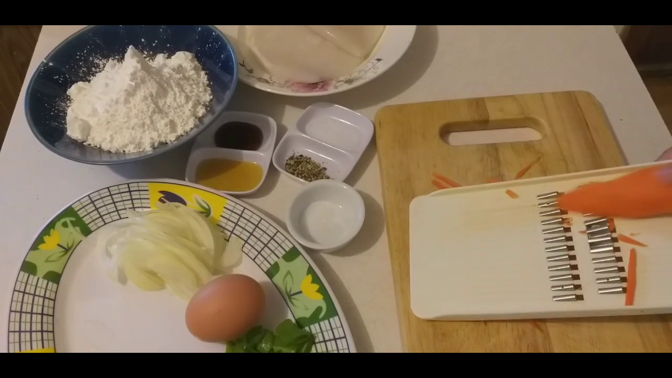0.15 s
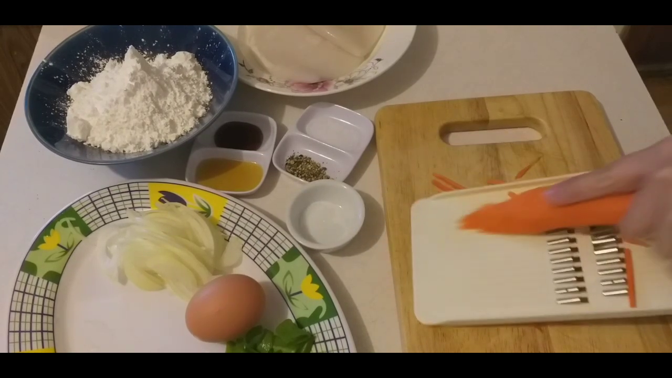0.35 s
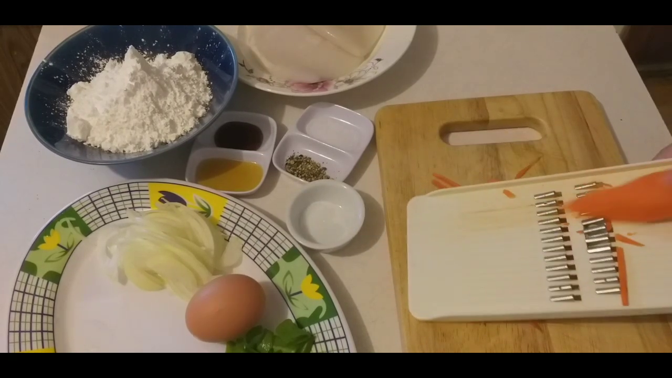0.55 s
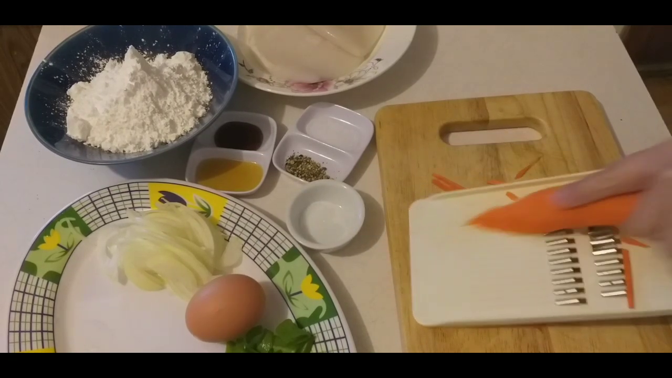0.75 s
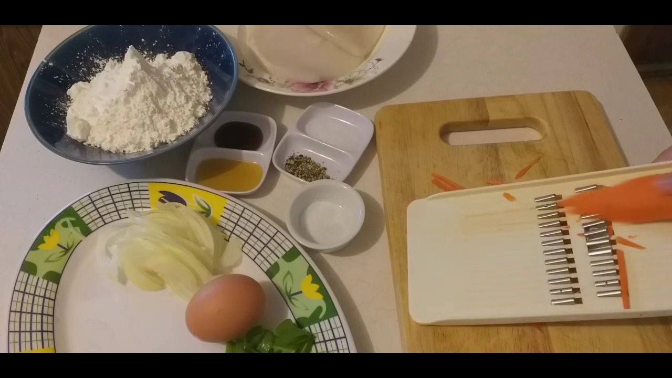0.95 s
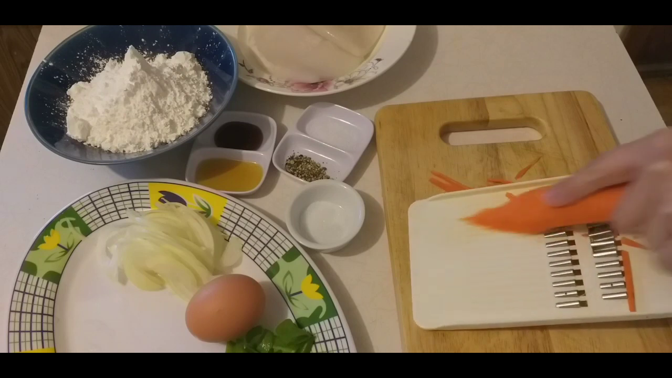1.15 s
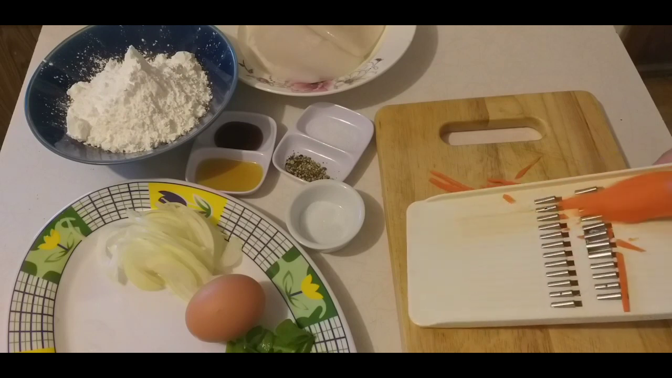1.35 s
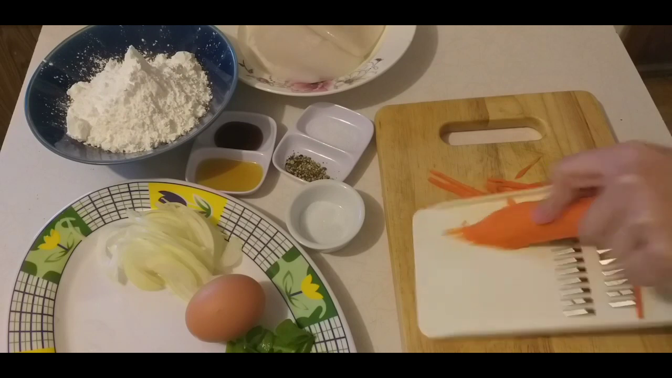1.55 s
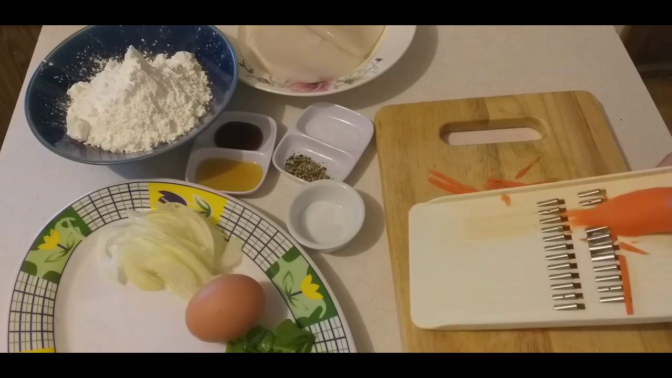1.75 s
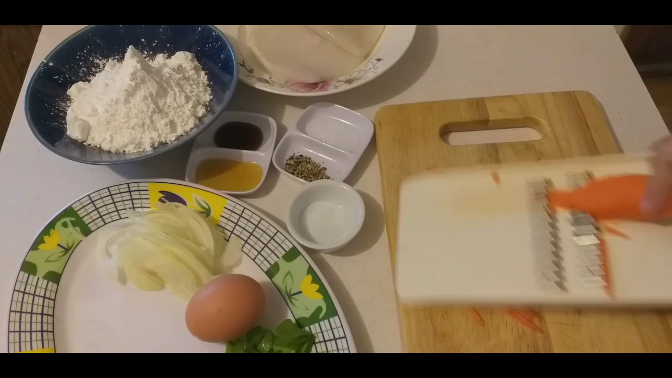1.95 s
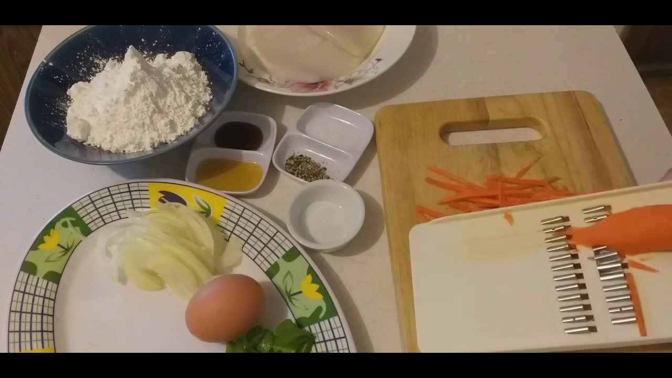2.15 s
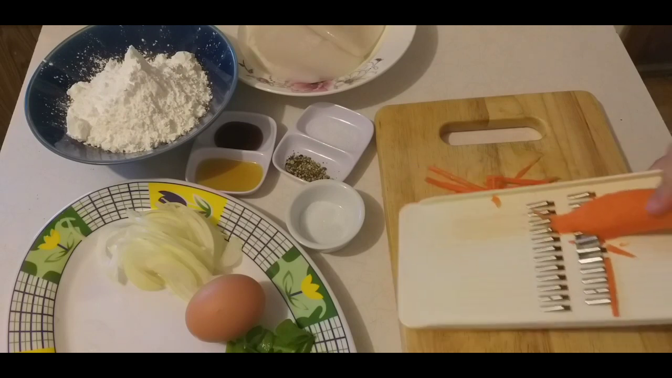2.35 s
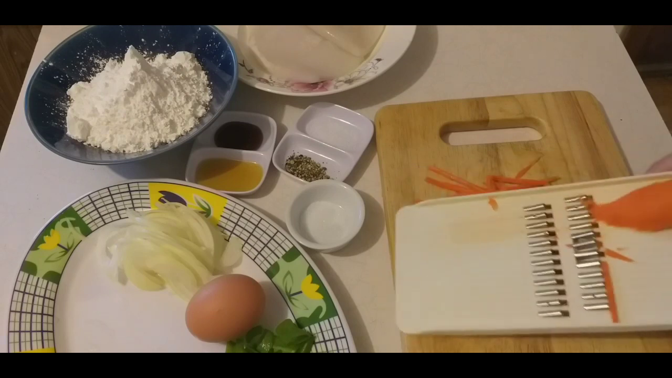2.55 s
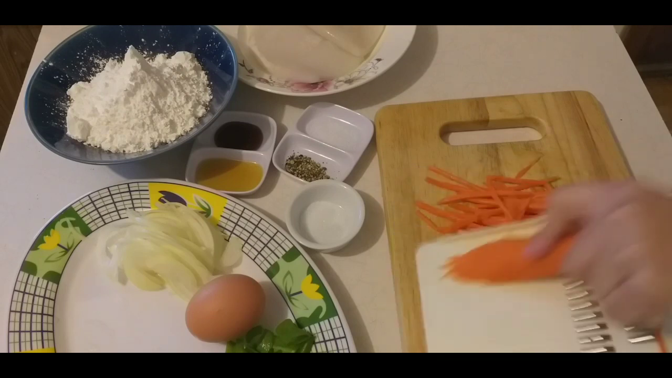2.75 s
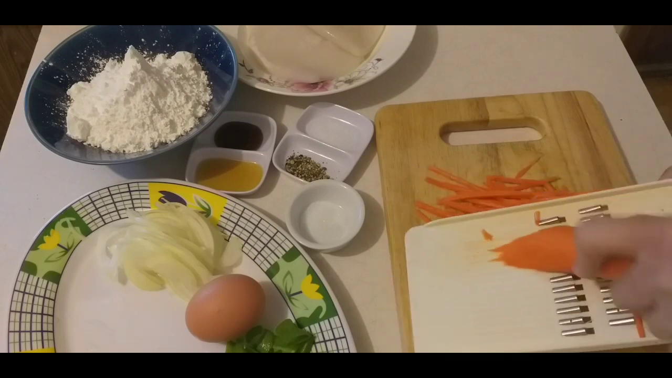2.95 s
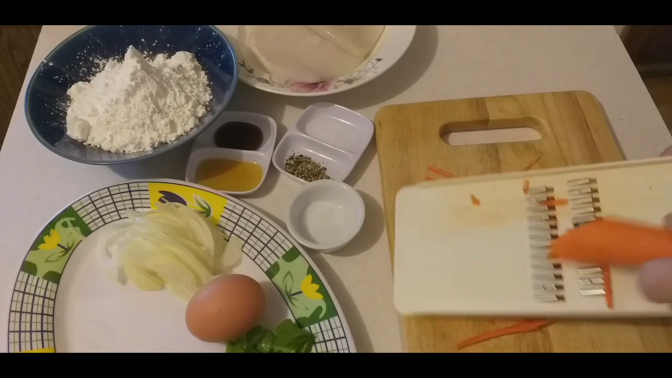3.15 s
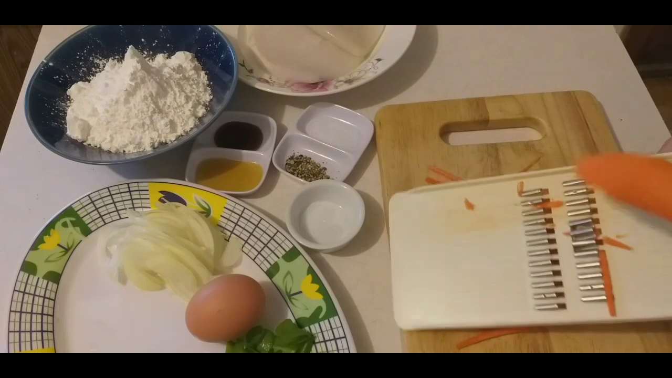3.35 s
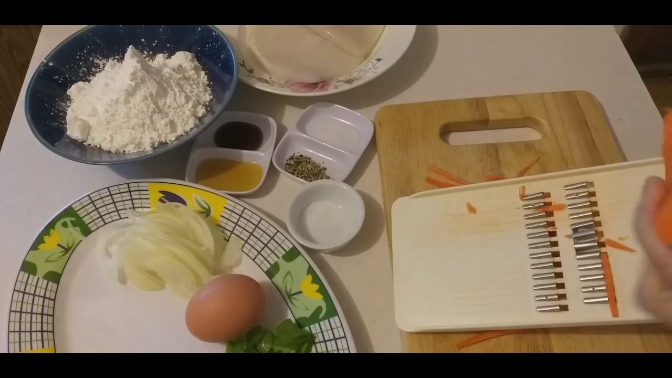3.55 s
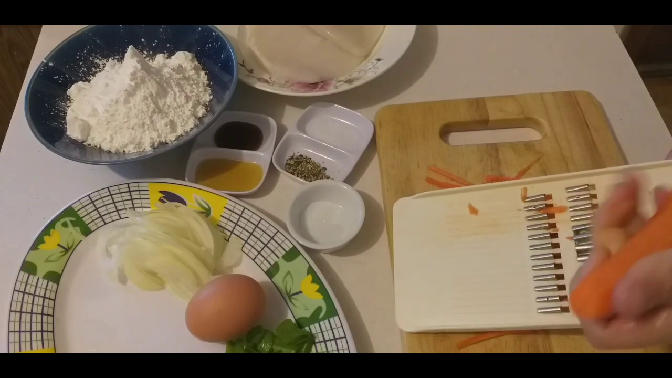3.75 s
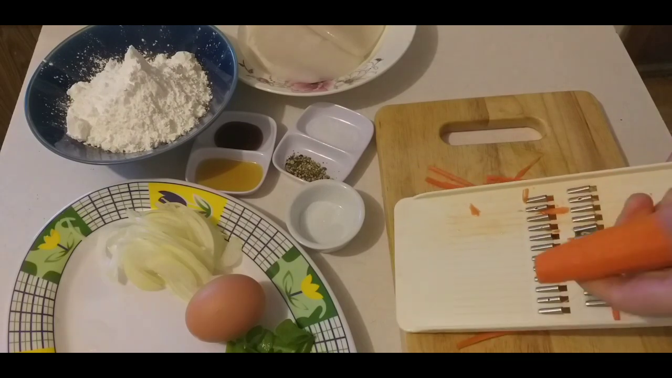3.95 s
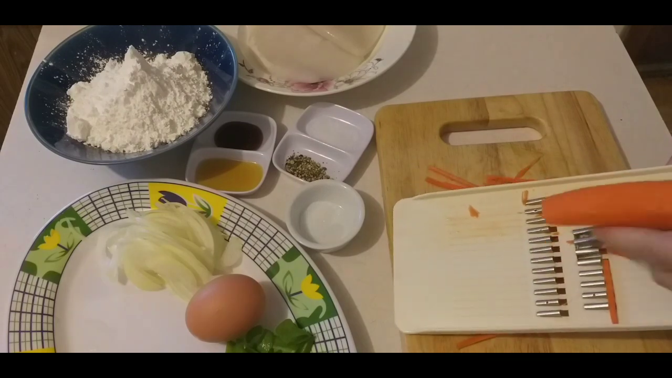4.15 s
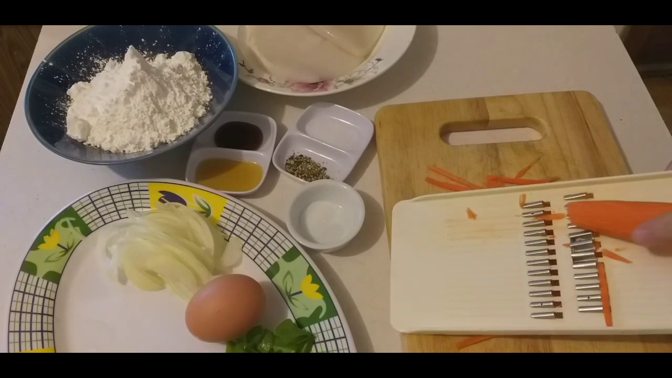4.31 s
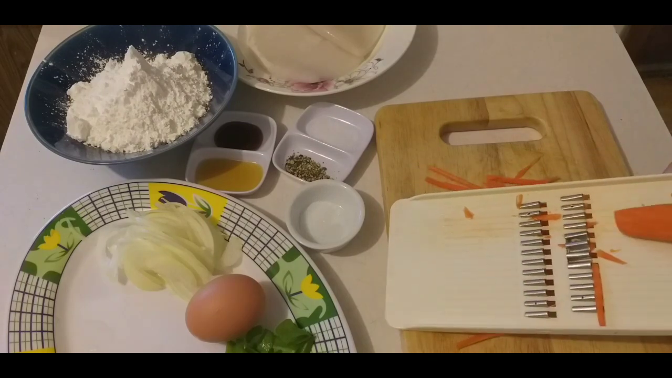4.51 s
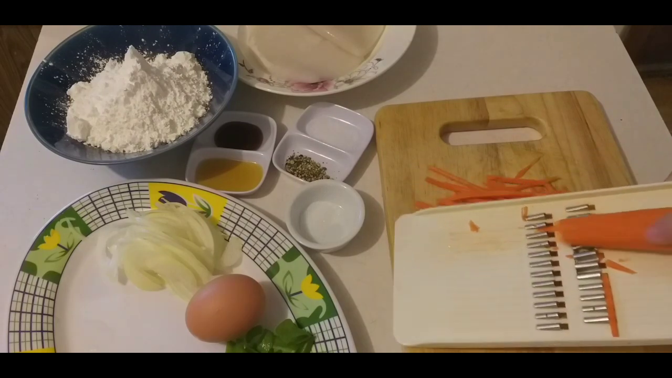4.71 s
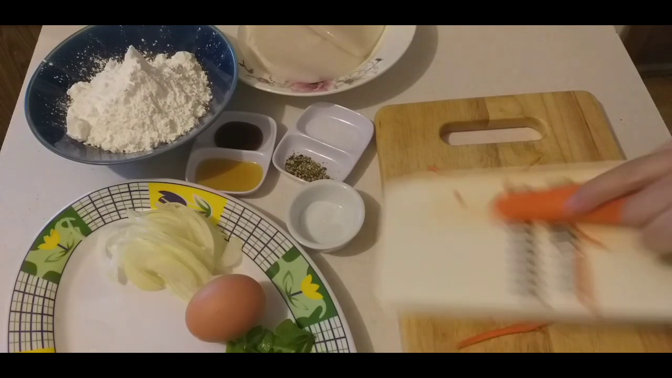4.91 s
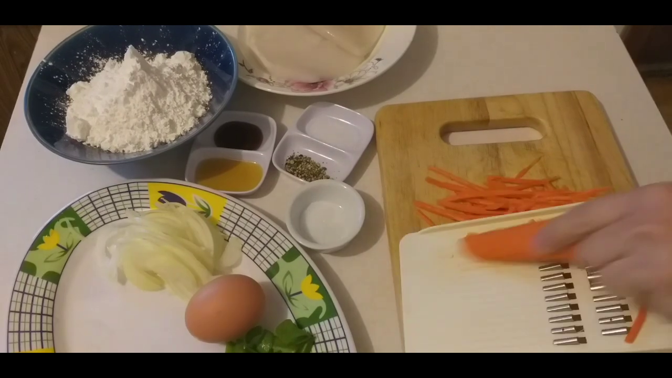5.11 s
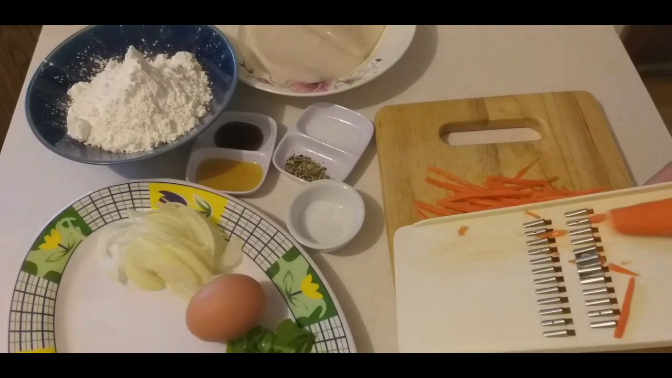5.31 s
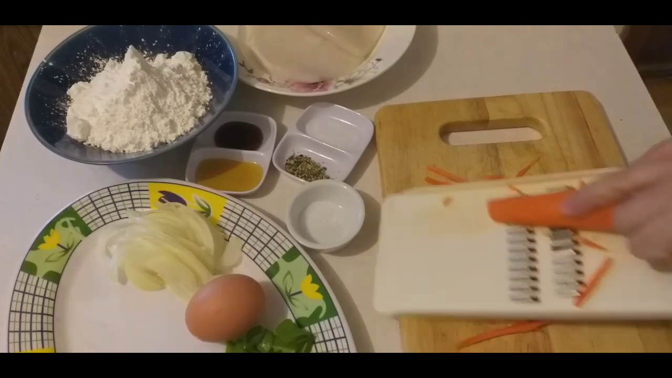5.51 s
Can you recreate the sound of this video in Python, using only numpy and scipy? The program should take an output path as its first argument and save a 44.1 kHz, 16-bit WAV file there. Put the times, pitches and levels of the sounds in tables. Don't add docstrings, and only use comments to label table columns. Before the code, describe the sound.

Close, dry, gritty carrot-slicing strokes with sharp snaps and knocks, a short near-silence in the middle, then quick harder pushes in a quiet kitchen.

```python
import sys
import numpy as np
from scipy import signal
from scipy.fft import rfft, irfft, next_fast_len
from scipy.io import wavfile
from scipy.ndimage import uniform_filter1d, map_coordinates

SR = 44100
rng = np.random.default_rng(int(sys.argv[2]) if len(sys.argv) > 2 else 0)


def volts_from_db(level):
    exponent = np.asarray(level, float) / 20
    return 10 ** exponent


def master(y):
    cut = np.clip(np.atleast_2d(y).T, -1, 1)
    pcm = np.round(cut * 32767)
    wavfile.write(sys.argv[1], SR, pcm.astype(np.int16))


N = 250488

# f/Hz, width/Hz, level/dB
TEETH_MODES = [(2500, 280, 3.5), (3210, 420, 3.5), (3526, 720, 2.5), (4860, 900, 4.5), (5700, 870, 5.5),
               (6900, 1100, 4), (8326, 690, 5.5)]
# f/Hz, density/dB per Hz
FIZZ_SPECTRUM = [(5290, -58.5), (9000, 7.5), (9920, -1.5), (12700, 3.5), (15100, -2.5), (16100, -26),
                 (16400, -29)]
# f/Hz, width/Hz, level/dB
PLATE_MODES = [(1030, 240, 1.5), (1207, 100, 7.5), (1530, 400, 1), (1760, 180, 7.5), (2070, 240, 3.5),
               (2735, 420, -2), (3600, 840, -3)]
# f/Hz, width/Hz, level/dB
BOARD_MODES = [(305, 79, 3.5), (443, 130, 3.5), (594, 59, 3.5), (773, 170, -5)]


def unit(x):
    return x / np.sqrt(np.mean(x ** 2) + 1e-20)


def along(points, hz):
    f, v = np.transpose(points)
    return np.interp(np.log(hz + 1), np.log(f + 1), v)


def wobble(rate):
    return map_coordinates(rng.standard_normal(int(N * rate / SR) + 4), [np.arange(N) * rate / SR])


def filtered(x, response):
    m = next_fast_len(N + SR // 2)
    return irfft(rfft(x, m) * response(np.fft.rfftfreq(m, 1 / SR)), m)[..., :N]


def body(modes, low_hz, top_hz=30000):
    def response(f):
        ring = 0
        for k, (centre, width, db) in enumerate(modes):
            band = 1j * f * width / (centre * centre - f * f + 1j * f * width)
            ring = ring + (-1) ** k * volts_from_db(db) * band
        return ring * (1j * f / (low_hz + 1j * f)) ** 4 / (1 + 1j * f / top_hz) ** 2
    return response


def floor():
    # f/Hz, density/dB per Hz
    air_spectrum = [(15, -38.5), (25, -14), (197, -4.5), (231, -13), (295, -13), (320, -12), (649, -25.5),
                    (828, -21), (1210, -27.5), (1310, -22.5), (1680, -33), (4220, -32.5), (4830, -33),
                    (15100, -36.5), (16400, -45)]
    # f/Hz, side minus mid/dB
    air_side = [(60, -18), (110, -18), (200, -22), (380, -22), (700, -16), (1290, -12), (2380, -7),
                (4400, -5), (8120, -2), (15000, -2)]
    # f/Hz, level/dB rms
    hum_partials = [(177.6, -89), (199.2, -76), (296.1, -77), (360.7, -84.5)]

    def colour(hz):
        return volts_from_db(along(air_spectrum, hz) + [0 * hz, along(air_side, hz)])

    air = filtered(rng.standard_normal((2, N)), colour)
    air *= volts_from_db(-67 + 0.24 * wobble(11)) / np.std(air[0])
    t = np.arange(N) / SR
    hum = np.zeros(N)
    for hz, db in hum_partials:
        level = volts_from_db(db + 3 + 3 * wobble(5.7))
        hum += level * np.sin(2 * np.pi * hz * t + 0.51 * wobble(13))
    return air[0] + hum, air[1]


def kitchen(x):
    # f/Hz, t60/s
    room_t60 = [(300, 0.29), (1400, 0.17), (2700, 0.13), (4000, 0.17), (9000, 0.05), (15000, 0.19)]
    out, hop = np.zeros(N + SR), SR // 4
    for start in range(0, N, hop):
        hz, t, z = signal.stft(rng.standard_normal(SR // 2), SR, nperseg=256)
        decay = volts_from_db(-60 * t / along(room_t60, hz)[:, None])
        tail = signal.istft(z * decay, SR, nperseg=256)[1]
        wet = signal.fftconvolve(x[start:start + hop], tail / np.linalg.norm(tail))
        out[start + 130:][:len(wet)] += wet
    return out[:N]


def scattered(x):
    z = signal.stft(x, nperseg=128)[2]
    turned = z * np.exp(2j * np.pi * rng.random(z.shape))
    return np.sqrt(2) * signal.istft(turned, nperseg=128)[1][:N]


def creaks():
    # t/s, length/s
    creak_times = [
        (3.155, .135),
        (3.348, .12),
        (3.373, .03),
    ]
    # f/Hz, width/Hz, level/dB
    creak_modes = [
        [(625, 160, -71.5), (1336, 40, -65.5), (1700, 210, -71.5)],
        [(399, 38, -64.5), (596, 180, -65), (1156, 170, -65.5), (1730, 180, -71)],
        [(1180, 250, -53.5), (510, 260, -78.5)],
    ]
    out, t = np.zeros(N), np.arange(N) / SR
    for (s, length), modes in zip(creak_times, creak_modes):
        swell = np.sqrt(np.sin(np.pi * np.clip((t - s) / length, 0, 1) ** 0.63))
        for hz, width_hz, db in modes:
            mode = body([(hz, width_hz, 0)], 100)
            rub = filtered(rng.standard_normal(N), lambda f: mode(f) ** 2)
            out += volts_from_db(db) * swell * unit(rub)
    return out


def taps():
    # t/s, crack peak/dB, plate over crack/dB, knock f/Hz
    knock_rows = [(0.2035, -31, -6.5, 1750), (0.4064, -23.5, -19, 1680), (1.0081, -27.5, -11.5, 1228),
                  (1.1134, -20, -16.5, 820), (1.4238, -20.5, -19, 1180), (1.6696, -41.5, -1, 1850),
                  (2.5806, -22, -9, 2000), (2.6194, -33, -12, 594), (2.8354, -25, -8.5, 1700),
                  (4.3687, -42, 4.5, 550), (4.3775, -40, 3, 612), (4.5284, -69.5, 10.5, 1020),
                  (4.6822, -48, 4.5, 1950), (4.736, -51, -1, 1000), (4.8658, -35, -5, 1760),
                  (5.0652, -11, -13, 1750), (5.3148, -50, -1.5, 1820), (5.3424, -56, 12.5, 1760),
                  (5.3694, -22.5, -3, 2070), (5.442, -20, -17, 1230), (5.5043, -16.5, -25, 474),
                  (5.57, -26, -13.5, 1710)]
    # t/s, crack peak/dB, plate over crack/dB, spit over crack/dB
    snap_rows = [(0.1531, -49.5, -17, -10), (0.2838, -12, -25.5, -29), (0.5363, -42, -22, -5),
                 (0.548, -46, -26.5, -6), (0.5773, -26.5, -19, -9.5), (0.617, -32.5, -14, -19),
                 (0.901, -47, -26, 2), (0.9265, -27.5, -19, -7), (0.9645, -16, -23, -17.5),
                 (1.3376, -43, -23, -0.5), (1.3887, -39.5, -11.5, 0), (1.4087, -28, -27, -6),
                 (1.7461, -36, -19.5, 0), (1.821, -23.5, -34, -12), (2.0695, -31, -19.5, -2),
                 (2.0785, -33, -23, -4), (2.1044, -18, -21, -5), (2.285, -45, -32, 2),
                 (2.3632, -43, -16, -2), (2.676, -28, -12, -15), (3.0255, -57, -37, 4),
                 (3.1296, -46, -31, -16), (3.27, -48, -21.5, 0.5), (4.7401, -28, -18, -16)]
    hits = [(*snap, 1480) for snap in snap_rows]
    for s, db, plate_db, knock_hz in knock_rows:
        spit_db = -44 + db - 0.5 * plate_db
        hits.append((s, db, plate_db, spit_db, knock_hz))

    t, hz = np.arange(4096) / SR - .004, np.fft.rfftfreq(4096, 1 / SR)
    t60 = np.array([[.013], [.012], [.012], [.02]])
    gain_db = np.array([[-1.5], [5], [8], [8]])
    responses = np.array([body(TEETH_MODES, 1200)(hz), volts_from_db(along(FIZZ_SPECTRUM, hz)),
                          body(PLATE_MODES, 300, 5000)(hz), body(BOARD_MODES, 260, 1500)(hz)])
    pitched = np.array([[0], [0], [1], [1]])
    out = np.zeros(N + len(t))
    for s, db, plate_db, spit_db, knock_hz in hits:
        board_db = plate_db - 8 * np.log2(knock_hz / 550)
        parts_db = np.array([[0], [spit_db], [plate_db], [board_db]])
        near_pitch = 0.44 + body([(knock_hz, .35 * knock_hz, 0)], 1)(hz)
        favour = np.where(pitched, near_pitch, 1)
        burst = rng.standard_normal((4, len(t))) * (t >= 0) * volts_from_db(-60 * t / t60)
        blow = irfft(rfft(burst) * responses * favour)
        blow *= volts_from_db(db + parts_db + gain_db) / np.abs(blow).max(1, keepdims=True)
        out[round((s + t[0]) * SR):][:len(t)] += blow.sum(0)
    return out[:N]


def tearing(density, spread_db, slide_db, clump_db):
    chance, sign, size = rng.random((3, N))
    breaks = (chance < density / SR) * np.sign(sign - .5) * volts_from_db(-spread_db * np.log(size + 1e-4))
    return volts_from_db(clump_db * wobble(260)) * (unit(breaks) + volts_from_db(slide_db) * rng.standard_normal(N))


def patchy(x, depth_db):
    z = signal.stft(x, nperseg=256)[2]
    field = uniform_filter1d(rng.standard_normal(z.shape), size=3, axis=0)
    field = uniform_filter1d(field, size=12, axis=1)
    return signal.istft(z * volts_from_db(depth_db * unit(field)), nperseg=256)[1][:N]


def contacts(rows, start_db, fast, tail_db, slow, board_db):
    layer_db = (-1.5, -10, -14.5, -1.5)
    dig_db = (-1, 1, 5.5, 5.5)
    fade_rate = (80.5, -9, 9, 26.5)
    weight_share = (-0.12, 1, 0.99, .4)
    swell_share = (-0.03, -0.093, 0.89, -0.34)
    lead = SR // 20
    out, t = np.zeros((5, N + 2 * SR)), np.arange(-lead, SR // 2) / SR
    for s, rise, length, db, weight_db in rows:
        after = np.maximum(t - length, 0)
        swell_db = -start_db * np.clip(1 - t / rise, 0, 1) ** 1.83
        swell_db += 1505.5 * np.minimum(t, 0)
        sag_db = 25.5 * np.clip(t - rise, 0, max(length - rise, 0))
        release = (volts_from_db(-fast * after) + volts_from_db(tail_db - slow * after)) / (1 + volts_from_db(tail_db))
        tear = volts_from_db(db + swell_db - sag_db) * release
        progress = np.clip(t / length, 0, 1) - .5
        parts_db = [level + dig * progress - fade * after + share * weight_db + late * swell_db
                    for level, dig, fade, share, late
                    in zip(layer_db, dig_db, fade_rate, weight_share, swell_share)]
        parts_db[2] = parts_db[2] + board_db
        first = round((s + 1) * SR) - lead
        out[:, first:first + len(t)] += (tear * volts_from_db([0 * t, *parts_db])) ** 2
    return out[:, SR:SR + N]


def strokes():
    # t/s, rise/s, contact length/s, tearing/dB, weight on the plate/dB
    cut_rows = [(-.2, 0.053, 0.17, -24.5, 3), (.21, 0.077, 0.18, -27.5, 1), (.612, 0.081, 0.15, -26.5, 0.5),
                (1.008, 0.096, 0.17, -26, -0.5), (1.402, 0.097, .16, -26.5, 0.5),
                (1.815, 0.022, 0.053, -32, -5.5), (2.658, 0.076, .12, -26, -1.5),
                (2.76, 0.036, 0.053, -24.5, 2), (4.742, 0.042, .055, -36.5, 2),
                (4.775, 0.043, 0.057, -30.5, 4.5), (4.976, 0.03, 0.057, -25.5, -0.5),
                (5.43, 0.014, 0.036, -34.5, 4.5), (5.455, 0.043, 0.083, -27.5, -1),
                (5.636, 0.023, 0.04, -28.5, 1)]
    slide_rows = [(.13, .03, 0.021, -57, -14), (.53, .03, 0.027, -56.5, 3), (.903, .005, .02, -57, -3),
                  (.93, .004, 0.0033, -51.5, 15.5), (.968, .005, 0.1, -53, 14.5),
                  (1.34, .005, 0.0049, -61.5, 12), (1.66, .02, 0.1, -56, 7), (1.89, .02, 0.045, -47, 8),
                  (2.03, .03, 0.038, -56.5, 6.5), (2.07, .004, 0.0047, -53, -8),
                  (2.108, 0.0044, .006, -38.5, -5), (2.26, .03, 0.14, -59, -6),
                  (2.35, .07, .11, -51.5, -1.5), (2.55, 0.035, 0.032, -56, 5), (2.97, .03, 0.036, -72, -15),
                  (3.12, .015, 0.12, -65, 7.5), (3.262, .008, 0.012, -60.5, -19),
                  (3.73, .03, 0.078, -75.5, 9.5), (4.23, .03, .06, -71, -8), (.18, .015, .02, -57, 13),
                  (1.75, 0.007, 0.052, -51, -3), (5.275, .015, 0.023, -63, 6)]
    # t/s, rise/s, contact length/s, tearing/dB, weight on the plate/dB
    rattle_rows = [
        (2.585, 0.0043, 0.025, -39, 10),
        (4.6, .03, 0.08, -76.5, 13),
        (4.685, .005, 0.039, -71, 28),
        (4.86, 0.014, 0.089, -46.5, 11.5),
        (5.018, 0.014, 0.047, -33, 15),
        (5.315, 0.0046, 0.04, -60, 16.5),
        (5.375, .004, 0.01, -53, 23.5),
    ]
    thud_rows = [
        (4.382, .005, 0.014, -65, 27),
        (4.44, .02, 0.081, -79, 21),
    ]
    # f/Hz, width/Hz, level/dB
    rim_modes = [(1750, 150, -1), (2050, 170, 2.5)]
    # f/Hz, width/Hz, level/dB
    table_modes = [(75, 21, -6.5), (158, 110, 4)]

    rattle = contacts(rattle_rows, start_db=7.5, fast=501, tail_db=-3.5, slow=169, board_db=-5.5)
    power = contacts(cut_rows, start_db=14, fast=501, tail_db=-8.5, slow=132.5, board_db=-1)
    power += contacts(slide_rows, start_db=6, fast=701, tail_db=3.5, slow=199.5, board_db=-1)
    power += rattle
    power += contacts(thud_rows, start_db=5, fast=399.5, tail_db=-4, slow=148, board_db=7.5)
    tear, fizz, plate, board, roots = np.sqrt(power + 1e-12)

    fibres = patchy(tearing(density=6000, spread_db=1.0, slide_db=-1.5, clump_db=1.03), depth_db=3)
    judder = patchy(tearing(density=3800, spread_db=3.5, slide_db=-1.5, clump_db=0.5), depth_db=3)
    judder = judder + 0.69 * fibres
    spray = fibres * np.sign(rng.standard_normal(N))

    teeth = filtered(fibres, body(TEETH_MODES, 990))
    tips = -filtered(fibres, body(TEETH_MODES[3:], 990))
    sound = (tear * tips + roots * (teeth - tips)) / np.std(teeth)
    sound += fizz * unit(filtered(spray, lambda hz: volts_from_db(along(FIZZ_SPECTRUM, hz))))
    sound += plate * unit(filtered(judder, body(PLATE_MODES, 270, 5000)))
    sound += np.sqrt(rattle[2]) * unit(filtered(judder, body(rim_modes, 300, 5000)))
    sound += board * unit(filtered(judder, body(BOARD_MODES, 190, 1100)))
    table = tear * volts_from_db(-3) * np.minimum(board / tear, volts_from_db(-2)) ** 3
    sound += table * unit(filtered(judder, body(table_modes, 40)))
    return volts_from_db(-3.14 + 0.99 * wobble(35)) * sound


def scene():
    # f/Hz, side minus mid/dB
    port_side = [(60, -19.5), (300, -33), (900, -28), (1800, -9), (2800, -17), (4500, -24.5), (7000, -25),
                 (8500, -15), (10200, -7.5), (11500, -22.5), (15000, -25)]
    # f/Hz, left minus right/dB
    port_lean = [(300, 0), (600, -.2), (1400, 1.5), (2800, .5), (5600, 0), (9000, -.7), (13000, 0)]
    air, hiss_side = floor()
    slicer = strokes() + taps() + creaks()
    mid = slicer + volts_from_db(-9) * kitchen(slicer)
    side = filtered(scattered(mid), lambda hz: volts_from_db(along(port_side, hz)))
    side += filtered(mid, lambda hz: np.tanh(along(port_lean, hz) * np.log(10) / 40))
    side += hiss_side
    return np.array([mid + air + side, mid + air - side])


def roll_off(x):
    return signal.sosfilt(signal.butter(12, 16530, fs=SR, output="sos"), x)


def record(dry):
    hz, _, z = signal.stft(dry, SR, nperseg=2048, noverlap=1536)
    power = np.mean(np.abs(z) ** 2, 0)
    near_db = 10 * np.log10(uniform_filter1d(power, size=7, axis=0) + 1e-20)
    cover_db = 10 * np.log10(power[hz > 3000].sum(0) + 1e-20) - 39
    bass_keep = 1 / (1 + volts_from_db(np.clip(8 * (cover_db - near_db), -90, 90)))
    keep = np.where(hz[:, None] < 900, bass_keep, hz[:, None] < 16100)
    mix = signal.istft(z * keep, SR, nperseg=2048, noverlap=1536)[1][:, :N]
    return roll_off(mix)


dry = scene()
out = record(dry)
master(out)
```